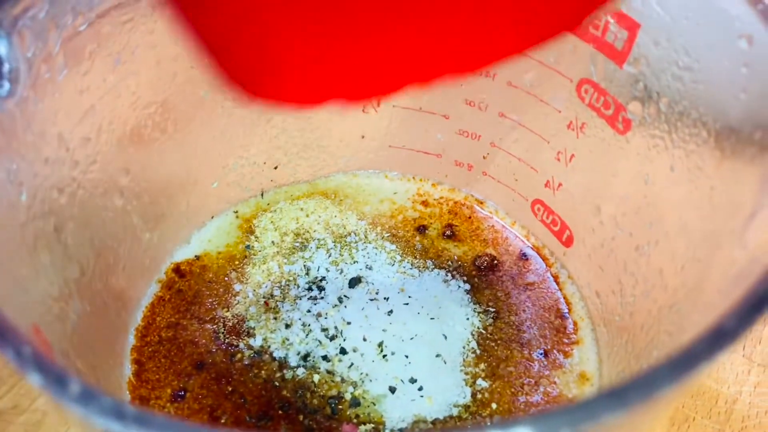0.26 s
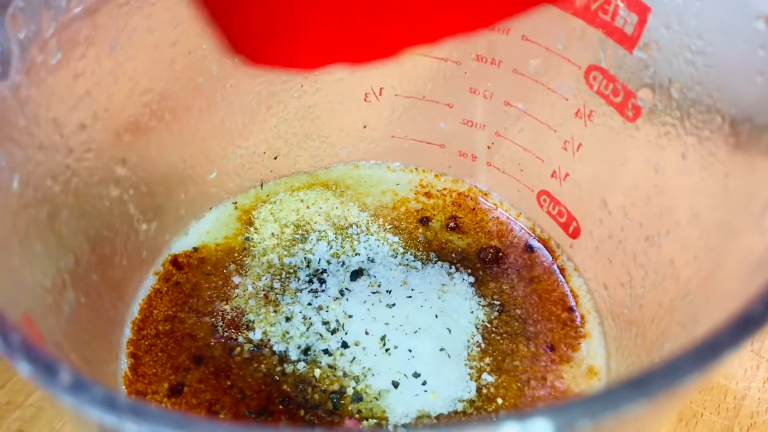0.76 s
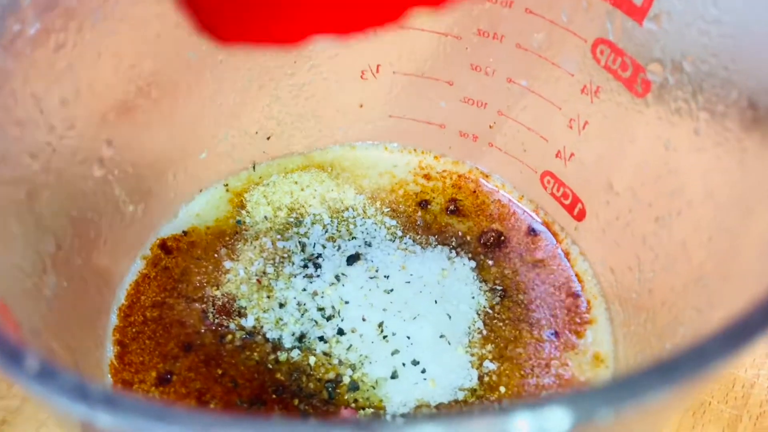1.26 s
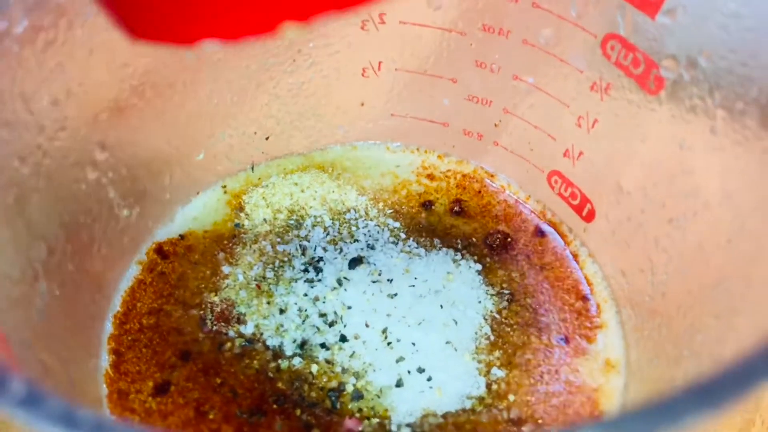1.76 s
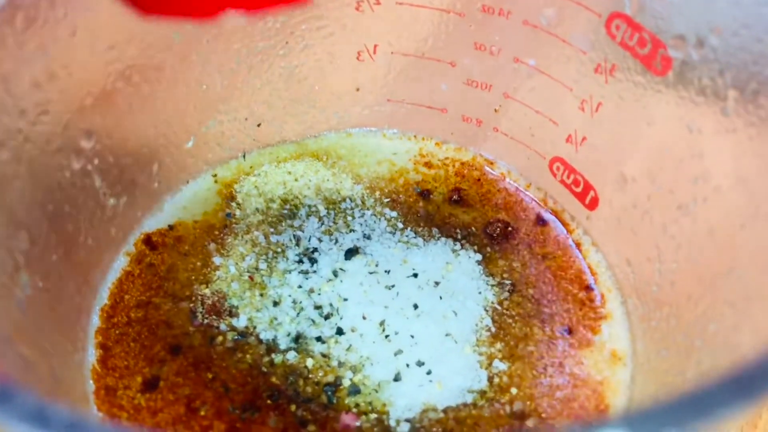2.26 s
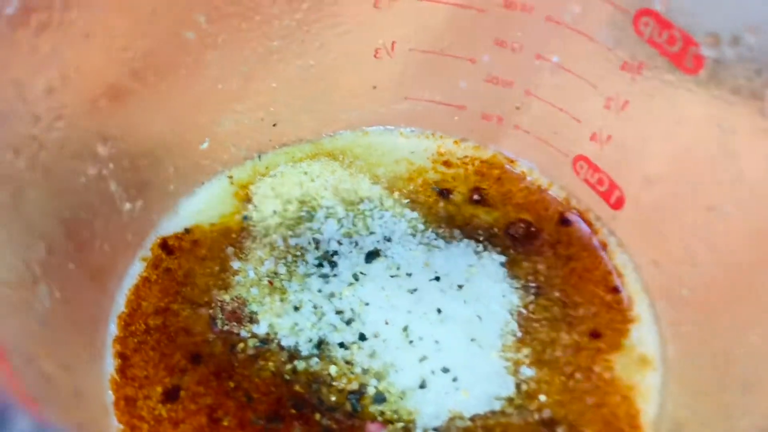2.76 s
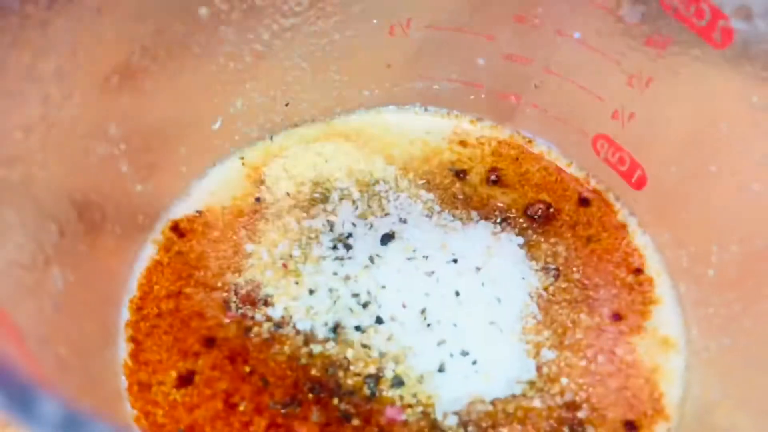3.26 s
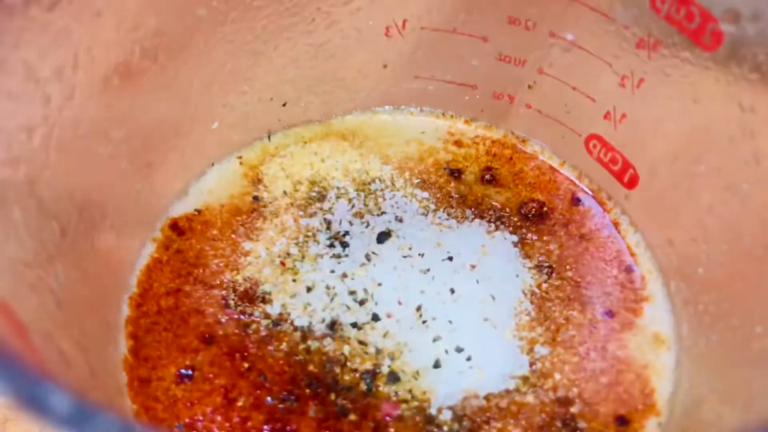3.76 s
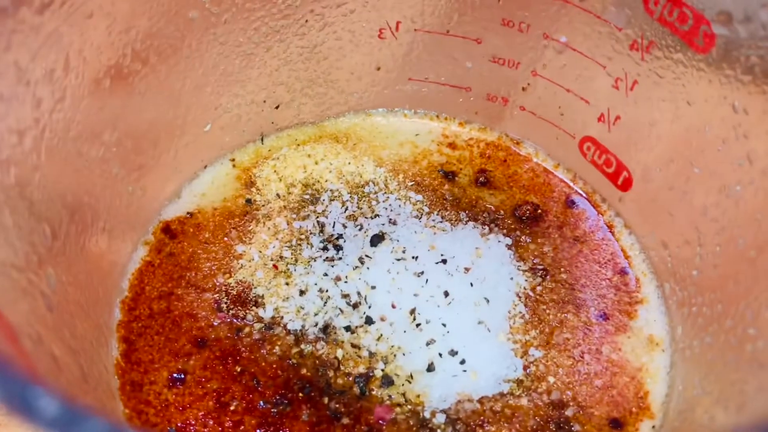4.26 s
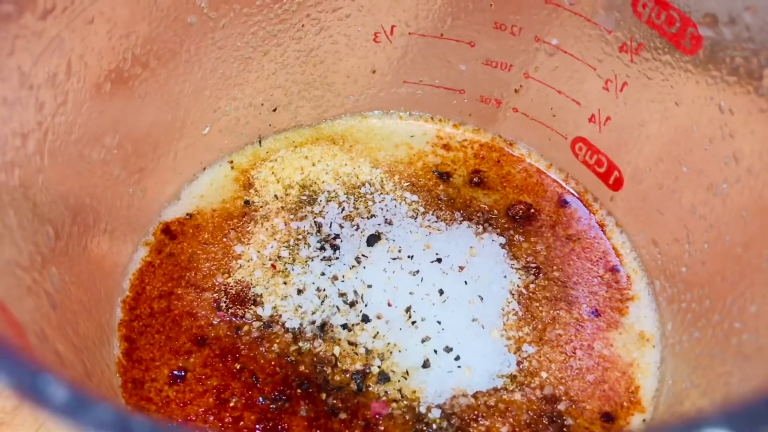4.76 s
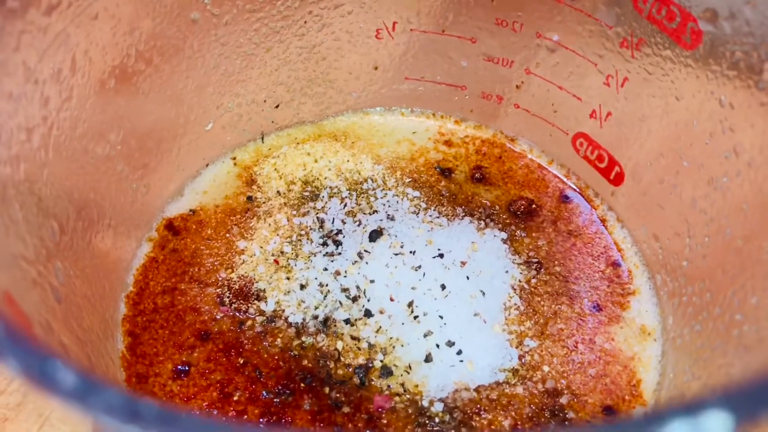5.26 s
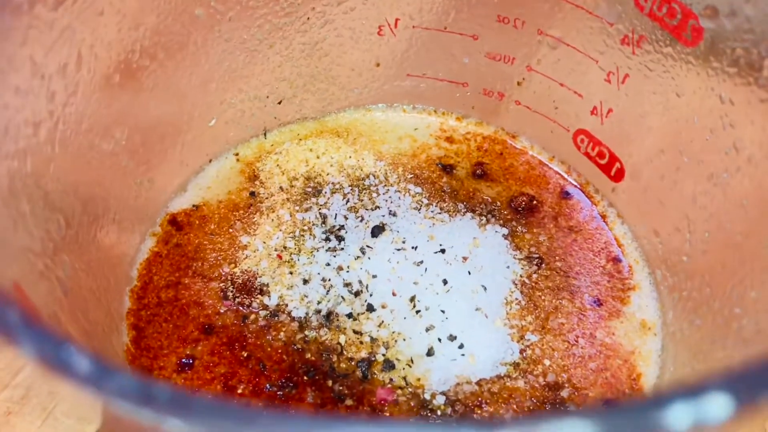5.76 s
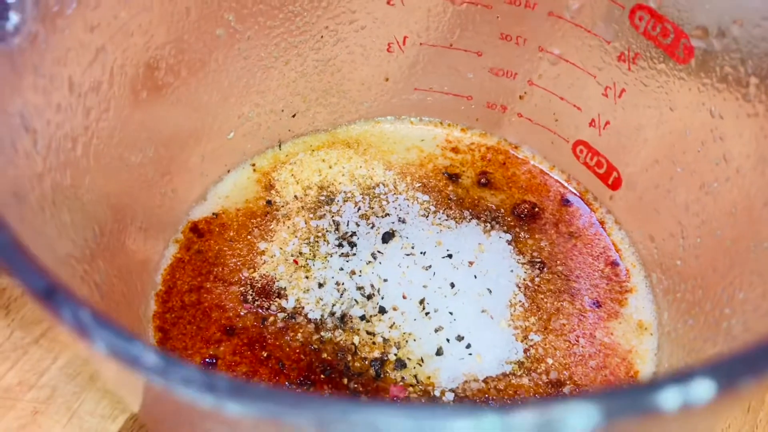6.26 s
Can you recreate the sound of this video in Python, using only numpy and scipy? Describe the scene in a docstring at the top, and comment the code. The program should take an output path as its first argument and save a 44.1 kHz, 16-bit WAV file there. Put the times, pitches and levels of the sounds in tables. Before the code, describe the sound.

A small plastic jar of dry grains is shaken six times in a quiet kitchen, then set down hard with a loud woody knock.

```python
"""A quiet kitchen: a plastic spice jar is shaken six times, then set down hard on a wooden counter.
Grains sliding and ticking in the jar are random impacts and noise heard through jar resonances.
The landing is a noise crack and short base flexes over decaying counter modes; sparse knocks are single modes.
A hand and sleeve rustle before and after the landing, as coloured fibre noise with shifting brightness.
Underneath: room noise, a mains hum that dips once, fan lines, faint drones, a thin whistle at the start."""
import sys
import numpy as np
from scipy import signal
from scipy.fft import rfft, irfft
from scipy.io import wavfile
from scipy.ndimage import uniform_filter1d

SR = 44100
rng = np.random.default_rng(int(sys.argv[2]) if len(sys.argv) > 2 else 0)


def int16_out(signal):
    """Quantize to a 16-bit WAV file."""
    q = np.round(np.clip(np.atleast_2d(signal).T, -1, 1) * 32767)
    wavfile.write(sys.argv[1], SR, q.astype(np.int16))


N = 286650  # 6.5 s

# Spectrum tables hold relative power density: hz, density_db. Their levels are set where they are used.

# room tone: hz, density_db
AIR_SPECTRUM = [(18, -51), (30, -19), (43, -9), (64, -7), (82, -11), (114, -16.5), (151, -17), (251, -10.5),
                (284, -6.5), (419, -20.5), (661, -20), (816, -29), (1350, -30), (2000, -38.5), (2600, -80)]
# thin treble of the room: hz, density_db
HISS_SPECTRUM = [(1200, -28), (2000, -2.5), (3600, -3.5), (5000, -8), (6200, -6.5), (7600, -10),
                 (9000, -8.5), (10500, -13), (12500, -8), (15900, -9)]
AIR_DB, HISS_DB = -56, -72.5
# fuzzy fan lines: hz, width_hz, level_db
FAN_LINES = [(49, 5, -65), (185, 20, -70), (291, 4, -64), (447, 15, -77), (650, 30, -73), (1244, 20, -82)]
# faint low drones: start_s, end_s, first_hz, last_hz, level_db
DRONES = [(-.1, 0.573, 72, 73.2, -56), (-.1, 0.544, 122, 120.2, -57.5), (0.716, 1.347, 92, 93.1, -62.5),
          (0.737, 1.35, 145, 151.2, -61), (1.33, 1.806, 128, 118.4, -57.5), (2.05, 2.547, 119, 118, -65)]
MAINS_HZ, MAINS_DB = 59.9, -57.5
DIP_START_S, DIP_END_S, DIP_DB, DIP_EDGE_S = 2.91, 3.2, -12, 0.08  # the mains hum dips once
# thin brief whistle: start_s, end_s, hz, width_hz, level_db
WHISTLE = (0, .16, 6350, 120, -78)
# reverberation: hz, t60_s
KITCHEN_T60 = [(100, 0.84), (500, 0.28), (1500, 0.25), (4000, 0.15), (15000, 0.09)]
SMALL_ECHO_DB, LANDING_ECHO_DB = -12.5, -14

# hand and sleeve, one table a movement: time_s, level_db, bright_db
RUSTLES = [
    [(3.0, -97, 0), (3.17, -72, 3), (3.23, -72, 0), (3.33, -69, 4.5), (3.38, -74, 0), (3.45, -69.5, 1),
     (3.75, -70, -3), (3.82, -68.5, -3), (3.9, -69.5, -2), (4.3, -76, -2), (4.5, -94, 2)],
    [(4.85, -99, 6), (5.08, -75, 0), (5.13, -70.5, -3), (5.2, -81.5, 3), (5.46, -66.5, -3), (5.5, -63, 0),
     (5.62, -62.5, 3), (5.73, -61.5, -6), (5.8, -56, -7), (5.84, -59, -3), (5.87, -51.5, -1),
     (5.92, -58, 4), (6.08, -66.5, -1.5), (6.18, -68, 0), (6.28, -80, 0), (6.33, -65.5, -1.5),
     (6.5, -65, 0.5)],
]
# main fibre noise, also the knocks' click: hz, density_db
CLOTH_SPECTRUM = [(1290, -12), (2200, -4), (2740, -1), (3490, -5.5), (4270, -4), (4990, -9.5), (5440, -5.5),
                  (7000, -11.5), (9100, -25), (15400, -120)]
# dull fibre noise: hz, density_db
CLOTH_LOW_SPECTRUM = [(300, -44), (600, 2), (1000, 0.5), (1650, 0), (2200, -11), (2800, -45)]
# bright fibre noise: hz, density_db
CLOTH_HIGH_SPECTRUM = [(4120, -55), (7000, -7), (7580, -8.5), (8660, -2), (10400, -3), (15200, 3),
                       (15900, -5)]
DULL_DB, DULL_DB_PER_BRIGHT_DB = -1.5, -0.34

# jar and hand touching things: start_s, level_db, hz
KNOCKS = [(2.354, -47.5, 208), (2.878, -59, 700), (2.878, -61, 1900), (3.262, -63, 4500),
          (3.282, -52, 1920), (3.281, -59, 5860), (3.32, -55, 12800), (3.334, -60.5, 4550),
          (3.432, -55, 1700), (3.805, -58, 1700), (3.808, -61, 3200), (4.738, -59, 1600), (4.96, -64, 4340),
          (5.112, -52.5, 3070), (5.111, -57, 1870), (5.49, -46, 602), (5.493, -48, 49),
          (5.493, -48.5, 1460), (5.748, -47, 1530), (5.801, -46.5, 76), (5.861, -54, 2600),
          (5.865, -41, 220), (5.868, -47, 632), (6.155, -44, 206), (6.157, -41, 79), (6.16, -51, 664),
          (6.18, -47.5, 110), (6.265, -45, 74), (6.363, -56, 1390)]
KNOCK_T60_S, KNOCK_T60_CYCLES = 0.032, 16.3  # summed: low knocks ring longer
CLICK_DB, CLICK_T60_S = -12, 0.012  # level relative to the knock

# blows on the counter: start_s, level_db
BLOWS = [(4.5595, -21.5), (4.737, -51)]
# counter modes: hz
COUNTER_HZ = [51, 63, 88, 104, 114, 140, 178, 234.6, 256, 296.7, 379, 413, 452, 513, 575, 626, 676, 724,
              821, 920, 980, 1131, 1211, 1380, 1650, 1884, 2650, 2950, 3350, 4264]
# the same modes in order: level_db (relative to the blow), t60_s
COUNTER_MODES = [(-5.5, 0.4), (-12.5, 0.99), (-10.5, 0.65), (-8, 0.13), (5, 0.15), (-23.5, 0.68),
                 (-12, 0.3), (-7.5, 0.65), (-9.5, 0.27), (-7.5, 0.28), (-14, 0.3), (-2, 0.24), (-3, 0.22),
                 (-3.5, 0.16), (-2, 0.093), (-20, 0.24), (-3, 0.24), (-4, 0.17), (-3.5, 0.087), (-5, 0.11),
                 (1, 0.051), (-17, 0.18), (-23, 0.17), (-15, 0.15), (-31, 0.32), (-29, .12), (-23, 0.041),
                 (-33, .05), (-22, 0.063), (-22, 0.082)]
# first contact of the jar's base: hz, density_db
CRACK_SPECTRUM = [(760, -15), (1300, 4), (1750, -11.5), (2500, -9), (3300, -6.5), (4870, -14.5),
                  (5700, -12), (8750, -19), (9720, -15), (11300, -20), (14900, -11), (15900, -38)]
CRACK_S, CRACK_DB = 4.5606, -21
# the base flexes as it lands and rocks: centre_s, level_db, hz
BASE_FLEXES = [(4.562, -5.5, 630), (4.5655, -17.5, 980), (4.5755, -14, 553), (4.582, -18, 636),
               (4.593, -17.5, 510)]
FLEX_SIGMA_S = 0.0012

# clumps landing in the jar: start_s, ring_db, ring_hz, low_db, grit_db, fine_db
# (last three relative to 6 dB below ring_db)
TICKS = [(0.144, -52, 1700, -5, -9, -15), (0.1757, -41, 1570, -15, -3, 6), (0.193, -43, 1360, 5, -16, -18),
         (0.264, -39, 1460, 0, -5, -16), (0.4997, -52.5, 1460, 3, -25, -17),
         (0.594, -52, 1470, -24, -9, -16), (0.6719, -35.5, 1445, 4.5, -5, -29),
         (0.9116, -50, 1430, -3, -30, -19), (1.0382, -49, 1640, -6, 2, 15),
         (1.0424, -33.5, 1570, -9, 3.5, 15.5), (1.0637, -33, 1570, -11, -13, -3),
         (1.072, -27.5, 1510, 0, -0.5, 0), (1.151, -57, 1560, -11, 5, -2), (1.1613, -49.5, 1370, -2, 1, 7),
         (1.3862, -54, 1390, 4, -17, -19), (1.462, -53, 1520, -10, 1, 5), (1.51, -45, 1570, -8, 2, 6),
         (1.5236, -33, 1444, 8, 4, -1), (1.5484, -46, 1457, -14, -8, -4), (1.5585, -42.5, 1500, -4, -4, 11),
         (1.5717, -49, 1440, -14, 3, 10), (1.8127, -56, 1410, 1, -2.5, -18),
         (1.937, -48, 1650, 7, -15, -16), (1.9621, -32, 1580, -21, -9, -10),
         (1.9706, -37.5, 1510, -4, 1, 9.5), (2.0004, -23.5, 1644, -4.5, -27, -27),
         (2.0091, -31, 1384, -19, -10, -12), (2.0342, -40.5, 1370, 0, 3, -13),
         (2.0427, -44, 1650, -15, -6, -11), (2.0953, -48.5, 1520, -17, 6, 12.5),
         (2.304, -52, 1630, -6, -7, -15), (2.3333, -38, 1670, -4, -5, -6),
         (2.36, -36.5, 1340, 6.5, -21, -12), (2.386, -35, 1450, -13, 0, 4), (2.432, -59, 1500, -15, -2, 14)]
TICK_T60_S, TICK_RISE_S = 0.045, 0.0013
# slides of grain, one or more a shake: full_s, stop_s, flow_db, rise_db_per_s, ring_db, fine_db
# (last two relative to the flow)
SHAKES = [(0.167, 0.276, -58, 800, 5.5, -3), (0.594, 0.689, -56, 450, 5, -6.5),
          (1.002, 1.047, -62, 350, 4.5, -4), (1.068, 1.099, -47.5, 900, 4, -4),
          (1.15, 1.174, -67, 900, -10, 2), (1.512, 1.571, -52, 255, 0, -4),
          (1.947, 1.98, -53.5, 453, 5, -4.5), (2.003, 2.043, -51, 1500, 2.5, -6),
          (2.333, 2.411, -55, 500, 4.5, -6.5)]
SWELL_DB_PER_S, STOP_DB_PER_S = 15, 612  # growth up to flow_db, then a quick stop
STRAGGLE_DB, STRAGGLE_DB_PER_S = -26.5, 120  # last grains after the stop
# air and wall of the jar: hz, width_hz, level_db
JAR_MODES = [(845, 86, -24), (964, 124, 0.5), (1400, 59, 6), (1646, 206, 8.5)]
# higher jar modes: hz, width_hz, level_db
JAR_OVERTONES = [(2910, 180, 1), (3210, 150, 2), (4690, 120, -5.5), (5180, 150, -2.5), (6720, 100, -5)]
# sliding grains: hz, density_db
GRIT_SPECTRUM = [(1290, -47), (2200, -17), (2400, 1), (2900, 3), (3210, 3.5), (3640, -1), (3900, -4),
                 (4230, 1), (5000, -1.5), (6840, -7.5), (8000, -33), (10400, -52), (17600, -120)]
# finest grains: hz, density_db
FINE_SPECTRUM = [(4710, -18.5), (8000, -3.5), (9480, 1), (10800, -4.5), (11600, 2), (12400, -2),
                 (14600, 2.5), (15900, -7)]

EDGE_HZ = 15850  # top of the recorded band


def gain_of(db):
    """Decibels to gain."""
    return 10 ** (np.asarray(db) / 20)


def evened(x):
    """Scales to rms 1."""
    return x / np.sqrt(np.mean(x ** 2) + 1e-20)


def read(points, hz):
    """Reads a spectrum table on a log-frequency axis."""
    f, value = np.transpose(points)
    return np.interp(np.log(hz + 1), np.log(f + 1), value)


def add(mix, s, sound):
    """Mixes a sound in at a time, cut at the end of the mix."""
    part = mix[round(s * SR):][:len(sound)]
    part += sound[:len(part)]


def coloured(x, points):
    """Filters a signal by a spectrum table, to rms 1."""
    hz = np.fft.rfftfreq(len(x), 1 / SR)
    return evened(irfft(rfft(x) * gain_of(read(points, hz)), len(x)))


def resonate(x, hz, width_hz):
    """One resonance of peak gain about 1: a single complex pole."""
    pole = np.exp((2j * np.pi * hz - np.pi * width_hz) / SR)
    return 2 * signal.lfilter([1 - abs(pole)], [1, -pole], x).real


def ringing(drive, modes):
    """A drive heard through steep resonances, at rms 1."""
    total = 0
    for hz, width_hz, db in modes:
        # two wider passes in series make one steep peak of about width_hz
        once = resonate(drive, hz, 1.7 * width_hz)
        twice = resonate(once, hz, 1.7 * width_hz)
        total = total + gain_of(db) * twice / np.sqrt(width_hz)
    return evened(total)


def smoothed_twice(x, size, axis=-1):
    """Two running means."""
    return uniform_filter1d(uniform_filter1d(x, size=size, axis=axis), size=size, axis=axis)


def grains(count, per_s, spread_db, clump_db):
    """Random impacts of uneven size that arrive in clumps a few milliseconds long."""
    size = gain_of(spread_db * np.minimum(rng.exponential(1, count), 5))
    clumps = evened(smoothed_twice(rng.standard_normal(count), 150))
    hits = rng.random(count) < per_s / SR
    return size * gain_of(clump_db * clumps) * rng.standard_normal(count) * hits


def patchy(x, patch_db):
    """Impact noise whose colour varies in random patches of time and frequency, at rms 1."""
    z = signal.stft(x, nperseg=256, noverlap=192)[2]
    patches = uniform_filter1d(rng.standard_normal(z.shape), size=5, axis=0)
    patches = evened(uniform_filter1d(patches, size=10, axis=1))
    varied = signal.istft(z * gain_of(patch_db * patches), nperseg=256, noverlap=192)[1]
    return evened(varied[:len(x)])


def ping(s, db, hz, t60_s, rise_s=0, rough=0.84):
    """One mode struck once: a decaying sine roughened by narrow noise."""
    t = np.arange(round(.3 * SR)) / SR
    noise = evened(resonate(rng.standard_normal(len(t)), hz, 0.23 * hz))
    ring = np.sin(2 * np.pi * hz * t) + rough * noise
    rise = np.minimum(t / (rise_s + 1 / hz), 1)
    return s, gain_of(db - 60 * t / np.clip(t60_s, .005, .5)) * ring * rise


def room_tone():
    """Steady air noise and thin hiss."""
    hiss = gain_of(HISS_DB) * coloured(rng.standard_normal(N), HISS_SPECTRUM)
    return hiss + gain_of(AIR_DB) * coloured(rng.standard_normal(N), AIR_SPECTRUM)


def mains():
    """Appliance hum: one sine that dips once."""
    t = np.arange(N) / SR
    dip = np.clip(np.minimum(t - DIP_START_S, DIP_END_S - t) / DIP_EDGE_S + .5, 0, 1)
    return np.sqrt(2) * gain_of(MAINS_DB + DIP_DB * dip) * np.sin(2 * np.pi * MAINS_HZ * t)


def fan():
    """Fuzzy fan lines: noise through narrow resonances."""
    out = np.zeros(N)
    for hz, width_hz, db in FAN_LINES:
        out += gain_of(db) * evened(resonate(rng.standard_normal(N), hz, width_hz))
    return out


def drones():
    """Gliding, wavering low sines that swell and fade."""
    t = np.arange(N) / SR
    out = np.zeros(N)
    for start_s, end_s, first_hz, last_hz, db in DRONES:
        u = np.clip((t - start_s) / (end_s - start_s), 0, 1)
        turns = np.cumsum(first_hz + (last_hz - first_hz) * u) / SR + rng.random()
        waver_db = 2.5 * np.sin(2 * np.pi * (5.5 * t + rng.random()))
        envelope = np.sqrt(2) * gain_of(db + waver_db) * np.sin(np.pi * u) ** 0.41
        out += envelope * np.sin(2 * np.pi * turns)
    return out


def whistle(start_s, end_s, hz, width_hz, db):
    """Narrow noise with soft ends."""
    count = round((end_s - start_s) * SR)
    noise = evened(resonate(rng.standard_normal(count), hz, width_hz))
    return start_s, gain_of(db) * noise * signal.windows.tukey(count, .4)


def kitchen(x):
    """Reverberation: delayed noise tail above the bass, each band with its own decay."""
    hz, t, z = signal.stft(rng.standard_normal(SR // 2), SR, nperseg=256)
    fall = gain_of(-60 * t / read(KITCHEN_T60, hz)[:, None])
    tail = signal.istft(z * (hz > 300)[:, None] * fall, SR, nperseg=256)[1]
    tail = np.concatenate([np.zeros(200), tail])
    return signal.oaconvolve(x, tail / np.linalg.norm(tail))[:N]


def stroke(rows):
    """Start time, soft ends, and a table's columns interpolated to sample rate."""
    s, *columns = np.transpose(rows)
    t = np.arange(s[0], s[-1], 1 / SR)
    ends = np.minimum(np.minimum(t - s[0], s[-1] + .01 - t) / .01, 1)
    return s[0], ends, [np.interp(t, s, c) for c in columns]


def rustle(rows):
    """Dense fibre noise; its dull part yields as the hand's movement brightens it."""
    s, ends, (level_db, bright_db) = stroke(rows)
    fibres = grains(count=len(ends), per_s=15000, spread_db=0.0, clump_db=-2.0)
    drive = patchy(fibres, patch_db=1.5)
    dull_db = DULL_DB + DULL_DB_PER_BRIGHT_DB * bright_db
    dull = gain_of(dull_db) * coloured(drive, CLOTH_LOW_SPECTRUM)
    bright = gain_of(bright_db) * coloured(drive, CLOTH_HIGH_SPECTRUM)
    return s, ends * gain_of(level_db) * (coloured(drive, CLOTH_SPECTRUM) + dull + bright)


def knock(s, db, hz):
    """A small knock on one mode; those above 500 Hz start with a broad click."""
    ring = ping(s, db, hz, KNOCK_T60_S + KNOCK_T60_CYCLES / hz)[1]
    t = np.arange(len(ring)) / SR
    noise = coloured(rng.standard_normal(len(t)), CLOTH_SPECTRUM)
    click = noise * gain_of(db + CLICK_DB - 60 * t / CLICK_T60_S)
    return s, ring + click * (hz > 500)


def blow(s, db):
    """Counter modes bloom over a cycle or two, neighbours in opposite phase, and die away."""
    t = np.arange(SR // 2) / SR
    out = np.zeros(len(t))
    for k, (hz, (mode_db, t60_s)) in enumerate(zip(COUNTER_HZ, COUNTER_MODES)):
        envelope = gain_of(db + mode_db - 60 * t / t60_s) * (1 - np.exp(-t * hz / 1.9))
        out += (-1) ** k * envelope * np.sin(2 * np.pi * hz * t)
    return s, out


def crack():
    """Base meets wood: sharp noise, its treble dying first, each band with a fast and a slow decay."""
    t = np.arange(SR // 8) / SR
    noise = coloured(rng.standard_normal(len(t)), CRACK_SPECTRUM)
    dull = signal.sosfilt(signal.butter(2, 5000., fs=SR, output="sos"), noise)
    dull_fall = gain_of(-60 * t / 0.042) + gain_of(-14 - 60 * t / .1)
    treble_fall = gain_of(1.0 - 60 * t / 0.024) + gain_of(-9.0 - 60 * t / 0.043)
    sound = dull * dull_fall + (noise - dull) * treble_fall
    return CRACK_S, gain_of(CRACK_DB) * sound * np.minimum(t / 0.0015, 1)


def base_flexes():
    """The base flexes as it lands and rocks: sines under short Gaussian bursts."""
    out = np.zeros(N)
    for s, db, hz in BASE_FLEXES:
        u = np.arange(N) / SR - s
        burst = gain_of(db) * np.exp(-.5 * (u / FLEX_SIGMA_S) ** 2)
        out += burst * np.sin(2 * np.pi * hz * u)
    return out


def gritty(drive):
    """Grain noise, part of it coloured by the jar's higher modes."""
    return evened(coloured(drive, GRIT_SPECTRUM) + 0.36 * ringing(drive, JAR_OVERTONES))


def tick(s, db, hz, low_db, grit_db, fine_db):
    """A clump of grains lands: the jar rings, with a low body and quick sprays of grit."""
    t = np.arange(round(.3 * SR)) / SR
    noise = rng.standard_normal((3, len(t)))
    fall = gain_of(db - 60 * t / TICK_T60_S) * np.minimum(t / TICK_RISE_S, 1)
    low = gain_of(low_db) * evened(resonate(noise[0], 770.0, 600.0))
    grit = gain_of(grit_db) * gritty(noise[1])
    fine = gain_of(fine_db - 2900 * t) * coloured(noise[2], FINE_SPECTRUM)  # dies much faster
    ring = ping(s, db, hz, 0.75 * TICK_T60_S, TICK_RISE_S, rough=0.14)[1]
    return s, ring + .5 * (low + grit + fine) * fall


def shake(full_s, stop_s, db, rise_db_per_s, ring_db, fine_db):
    """Grains slide along the jar: grit, fine fizz, and the jar's hollow ring."""
    t = np.arange(full_s - .12, stop_s + .14, 1 / SR)
    early_s, late_s = np.maximum(full_s - t, 0), np.maximum(t - stop_s, 0)
    swell_db = SWELL_DB_PER_S * (t + early_s - late_s - stop_s)
    flow = gain_of(db - rise_db_per_s * early_s + swell_db)
    flow = flow * (gain_of(-STOP_DB_PER_S * late_s) + gain_of(STRAGGLE_DB - STRAGGLE_DB_PER_S * late_s))
    drive = patchy(grains(count=len(t), per_s=8000, spread_db=2.5, clump_db=1.0), patch_db=3.0)
    ring = gain_of(ring_db) * ringing(drive, JAR_MODES)
    fine = gain_of(fine_db) * coloured(drive, FINE_SPECTRUM)
    return t[0], signal.windows.tukey(len(t), .15) * flow * (gritty(drive) + ring + fine)


def scene():
    """Near sounds and landing echo in the kitchen; counter and background stay dry."""
    background = room_tone() + mains() + fan() + drones()
    near, counter, landing = np.zeros(N), np.zeros(N), base_flexes()
    add(near, *whistle(*WHISTLE))
    for rows in RUSTLES:
        add(near, *rustle(rows))
    for play, table in ((knock, KNOCKS), (tick, TICKS), (shake, SHAKES)):
        for row in table:
            add(near, *play(*row))
    for row in BLOWS:
        add(counter, *blow(*row))
    add(landing, *crack())
    echo = kitchen(gain_of(SMALL_ECHO_DB) * near + gain_of(LANDING_ECHO_DB) * landing)
    return (background + near + counter + landing + echo)[None]


def record(dry):
    """Microphone bass roll-off, then the band limit."""
    thin = signal.sosfilt(signal.butter(4, 40., "high", fs=SR, output="sos"), dry)
    band = signal.firwin(511, EDGE_HZ, window=("kaiser", 9), fs=SR)
    return signal.oaconvolve(thin, band[None], "same")


dry = scene()
out = record(dry)
int16_out(out)
```